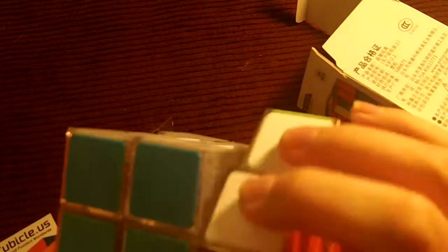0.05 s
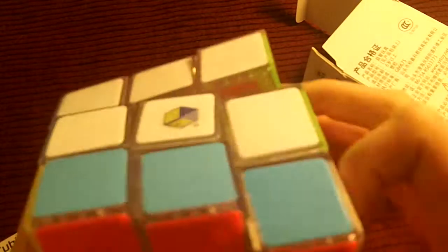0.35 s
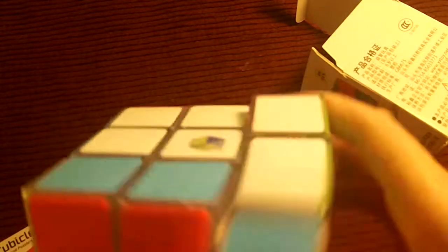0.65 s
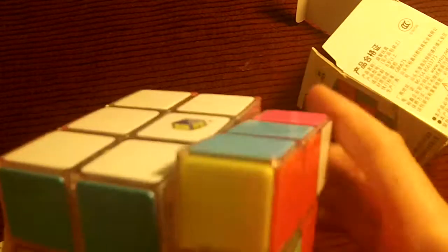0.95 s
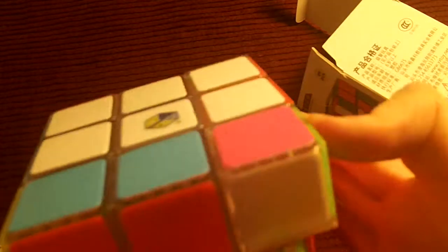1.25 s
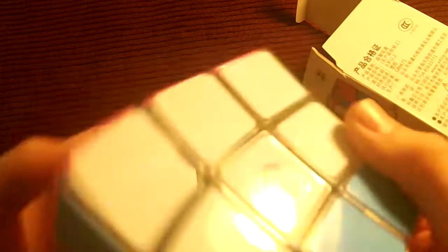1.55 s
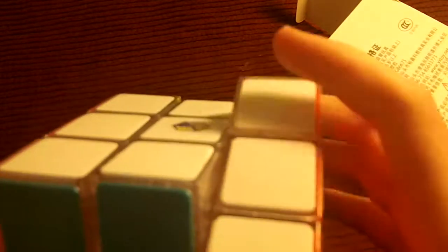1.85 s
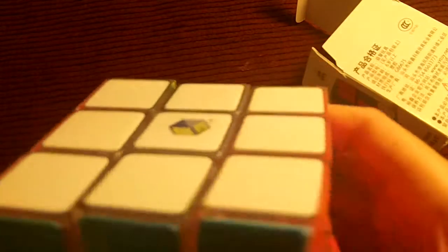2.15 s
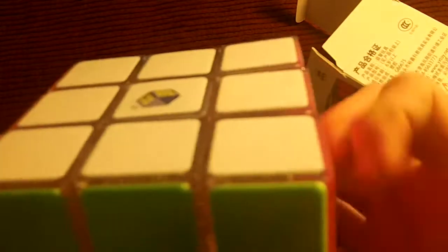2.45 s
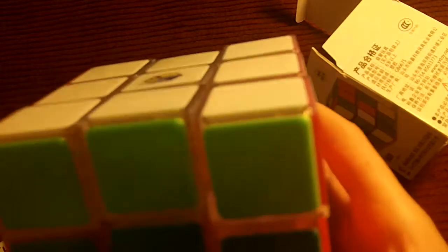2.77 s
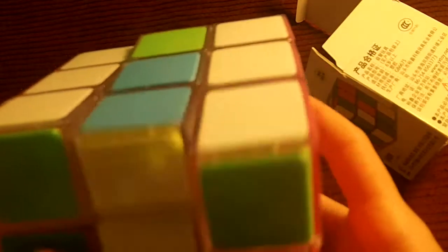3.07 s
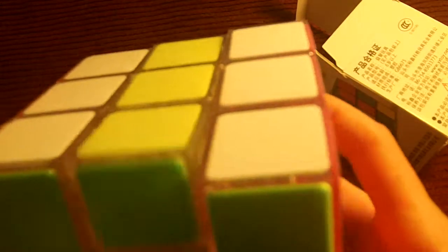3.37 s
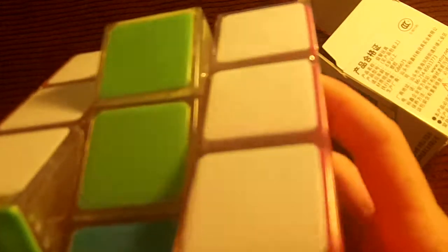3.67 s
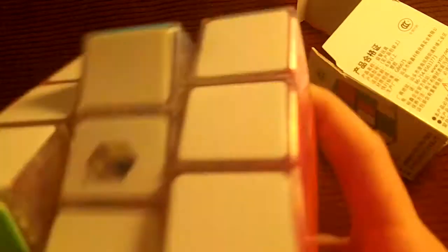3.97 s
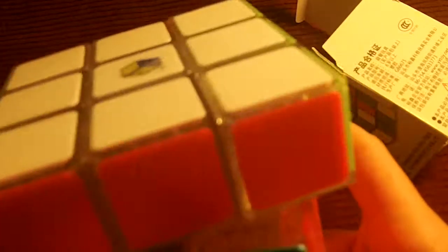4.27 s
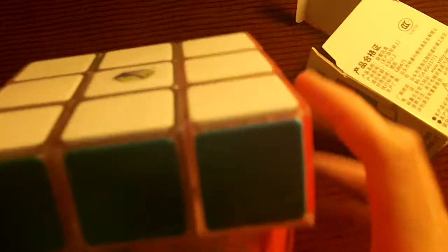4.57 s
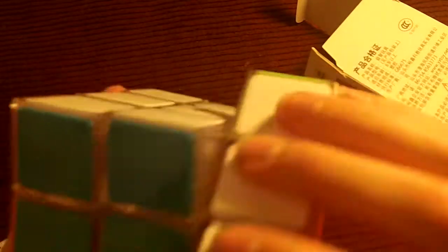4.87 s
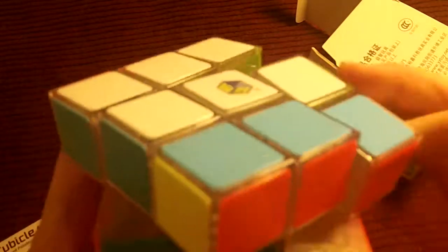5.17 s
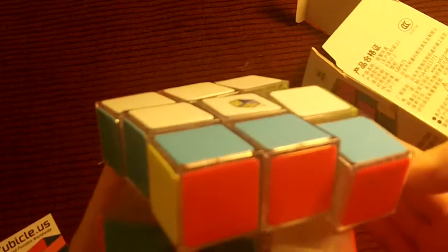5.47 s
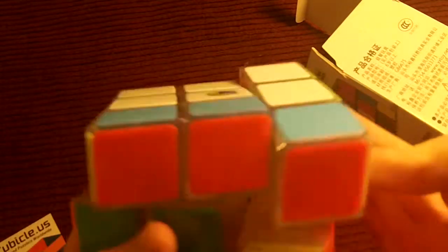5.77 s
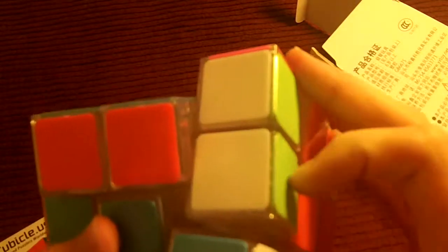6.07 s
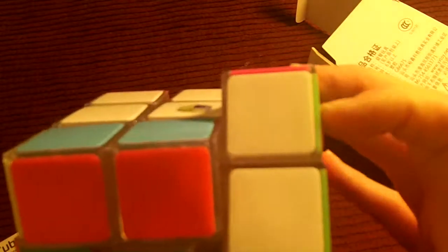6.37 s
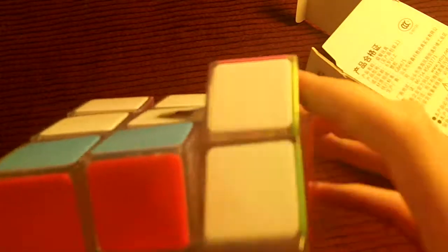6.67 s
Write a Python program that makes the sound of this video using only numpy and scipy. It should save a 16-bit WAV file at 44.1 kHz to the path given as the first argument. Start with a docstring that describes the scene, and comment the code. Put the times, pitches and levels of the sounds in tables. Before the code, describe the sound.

Close up, quick irregular bursts of plastic clicks, hollow knocks and rasping scrapes come from a puzzle cube being turned by hand. Brief lulls hold softer rubbing, dull taps and thin ticks, with a tiny squeak and a short hissing skid a little before the middle. More runs of clacks follow to the end, with a faint ring and a low hum in the small room.

```python
"""A small room: a plastic puzzle cube is turned quickly by hand, close to a microphone.
Each turn is a stick-slip scrape that swells until the layer stops. Pieces collide, ringing the hollow
inside and snapping on their thin shells; edges tick past. Between turns the fingers shift their hold
and the pieces rub, tap and rattle, with one tiny squeak and two hissing skids.
The room rings on faintly over a low hum; a limiter holds the loudest clacks down."""
import sys
import numpy as np
from scipy import signal
from scipy.fft import rfft, irfft
from scipy.io import wavfile
from scipy.ndimage import uniform_filter1d

SR = 44100
rng = np.random.default_rng(int(sys.argv[2]) if len(sys.argv) > 2 else 0)


def put_to_file(sound):
    """Save the sound as 16-bit audio at rate SR, in the file named by the first command-line argument."""
    columns = np.atleast_2d(sound).T  # one column per channel
    safe = np.clip(columns, -1, 1)
    whole_steps = np.round(safe * 32767)
    wavfile.write(sys.argv[1], SR, whole_steps.astype(np.int16))


N = 305422
TIME, HZ = np.arange(N) / SR, np.fft.rfftfreq(N, 1 / SR)
CLICK_S = .005  # nominal click length; also the lead-in before a contact
CONTACT_TIME = np.arange(SR // 22) / SR - round(CLICK_S * SR) / SR  # 0 at impact
KNOCK_DB, SNAP_DB = -5, 3.5  # radiation gains: cavity, shells

# Table levels are relative.
# room noise spectrum: f/Hz, level/dB
NOISE_SPECTRUM = [(20, -24), (70, -9), (130, -11), (900, -15), (3000, -39), (7000, -22.5), (15000, -28.5)]
# layer turns: stop t/s, run-up/s, rasp level/dB, cavity level/dB
LAYER_TURNS = [(0.033, 0.036, -28, -24), (0.096, 0.035, -31.5, -32), (0.174, 0.045, -30.5, -29),
               (0.299, 0.021, -28, -52), (0.442, 0.0087, -40, -47), (0.527, 0.053, -38, -29.5),
               (0.733, 0.076, -30.5, -29.5), (0.893, 0.19, -41, -37.5), (1.209, 0.068, -33.5, -46),
               (1.419, 0.034, -34, -23), (1.514, 0.053, -35, -29), (1.62, 0.027, -31.5, -38),
               (1.777, 0.12, -32.5, -36), (2.261, 0.031, -24, -20.5), (2.398, 0.038, -26.5, -24),
               (2.857, 0.055, -27, -29), (3.166, 0.077, -28, -35), (3.456, 0.049, -33.5, -38),
               (3.933, 0.071, -31.5, -35), (4.079, 0.18, -29, -31), (4.375, 0.042, -26, -36),
               (4.791, .1, -33, -37), (4.987, 0.066, -28, -36), (5.093, 0.034, -34, -38),
               (5.548, 0.029, -41, -53), (5.611, 0.03, -35.5, -45), (5.89, 0.19, -36, -41),
               (6.462, 0.035, -32, -30), (6.77, 0.11, -34, -36), (6.912, 0.014, -28, -35)]
# sliding plastic spectrum: f/Hz, level/dB
RUB_SPECTRUM = [(100, -6.5), (400, 2.5), (800, 11.5), (1500, 8.5), (2500, 0), (4000, 4), (7200, 1),
                (9500, -3.5), (12000, -13), (15500, -32)]
# cavity pitch as the grip opens and closes it: t/s, f/Hz
GRIP_PITCH = [(.3, 1040), (.5, 1170), (.75, 905), (2.4, 930), (2.9, 820), (3.9, 850), (4.8, 820),
              (5.2, 1200), (6.2, 1063)]
# pieces colliding: t/s, knock level/dB, cavity f/Hz, snap level/dB, shell f/Hz
COLLISIONS = [(0.0134, -18, 1040, -28, 3500), (0.033, -22, 810, -56, 3160), (0.1007, -18, 1080, -32, 2610),
              (0.1372, -10, 1055, -28.5, 2860), (0.179, -16, 1030, -21.5, 3930),
              (0.1997, -20, 1130, -30.5, 4000), (0.226, -12, 1070, -27, 4200),
              (0.287, -17, 1010, -31, 4470), (0.293, -18.5, 1090, -26, 3770),
              (0.517, -14.5, 1110, -37, 2740), (0.5318, -28, 960, -28, 4150),
              (0.5369, -30, 980, -26.5, 3700), (0.603, -24.5, 1020, -25.5, 3130),
              (0.7192, -23, 990, -29.5, 2200), (0.7275, -12, 990, -23, 4930),
              (0.7654, -12.5, 930, -23.5, 3060), (0.8601, -15.5, 1260, -19, 3880),
              (0.898, -21.5, 940, -22.5, 3260), (1.206, -20, 774, -33, 3640), (1.212, -19, 830, -24, 3660),
              (1.2166, -26, 980, -22.5, 3870), (1.4136, -22.5, 1290, -27, 3240),
              (1.4893, -20, 1060, -22, 5200), (1.4919, -20, 845, -19.5, 5200),
              (1.4961, -20.5, 930, -23, 4370), (1.518, -22.5, 990, -22, 4170), (1.572, -34, 955, -32, 3420),
              (1.6145, -17, 944, -26.5, 2370), (1.7315, -23, 1230, -40, 3300),
              (1.76, -19.5, 970, -24.5, 7300), (1.771, -15, 1100, -26.5, 2860),
              (2.2567, -17.5, 1290, -35, 3720), (2.2645, -20, 950, -23.5, 3670),
              (2.2925, -24, 1060, -28, 3830), (2.3766, -27, 920, -29, 3630),
              (2.3852, -28, 990, -23.5, 4900), (2.395, -17, 960, -24, 3800), (2.8153, -19, 1000, -39, 3410),
              (2.853, -11.5, 875, -22.5, 4060), (2.861, -29, 900, -30, 4250),
              (3.079, -39, 1050, -35.5, 4280), (3.118, -16.5, 940, -22.5, 1770),
              (3.1562, -20.5, 785, -28, 2620), (3.2029, -30, 910, -37, 2480), (3.418, -22, 930, -31, 3530),
              (3.448, -18, 1260, -33, 3310), (3.4544, -14.5, 980, -20.5, 3700),
              (3.4607, -16.5, 1230, -20.5, 3150), (3.9296, -17, 780, -28.5, 2720),
              (4.041, -18.5, 1220, -22.5, 3840), (4.0475, -23, 1060, -24.5, 4000),
              (4.067, -19.5, 980, -27, 5060), (4.0927, -18, 900, -24.5, 6200),
              (4.3709, -18.5, 980, -38, 3200), (4.402, -22.5, 840, -28, 3050),
              (4.7441, -14, 890, -26.5, 4660), (4.7692, -19.5, 980, -47, 3220),
              (4.7783, -22.5, 800, -30, 2880), (4.82, -16, 1195, -24, 3500), (4.9338, -20, 980, -33, 4470),
              (4.963, -15, 1380, -23, 4000), (4.982, -13, 890, -27.5, 4050), (5.007, -14, 1010, -22, 3360),
              (5.0859, -18.5, 1045, -19, 4830), (5.092, -15, 1100, -30.5, 4500),
              (5.6045, -29, 1300, -22, 3780), (5.608, -23, 1200, -20, 3930),
              (5.6126, -26.5, 1240, -24, 4340), (5.7725, -32, 960, -36, 5340),
              (5.8736, -29, 1070, -25.5, 4100), (5.8885, -30, 1090, -24.5, 3380),
              (6.479, -15, 1050, -26, 3670), (6.483, -11, 1245, -24.5, 3730),
              (6.4926, -25, 1070, -28, 5100), (6.541, -36, 1110, -36.5, 3900),
              (6.7174, -29, 1180, -29, 3050), (6.725, -15, 1030, -33, 2920),
              (6.7454, -24, 1210, -20.5, 3980), (6.7718, -34, 1060, -27, 5430),
              (6.788, -24.5, 940, -31.5, 3480), (6.8733, -11, 846, -24, 4230), (6.911, -16, 880, -19, 3350)]
# thin shell spectrum: f/Hz, level/dB
SHELL_SPECTRUM = [(70, -11.5), (250, -3.5), (700, 2), (1600, 10), (2500, 5), (4200, 5), (7200, 4.5),
                  (9000, -2), (12000, -10), (15500, -19.5)]
# dull taps of a finger or loose piece: t/s, level/dB
DULL_TAPS = [(0.072, -22.5), (0.236, -23), (0.6831, -23), (1.103, -29.5), (1.165, -29.5), (1.343, -31),
             (1.649, -35), (1.846, -35), (1.92, -38), (2.02, -35), (2.186, -32.5), (2.345, -23.5),
             (2.708, -38.5), (2.781, -32.5), (2.843, -22.5), (2.936, -28.5), (3.103, -26.5), (3.236, -32.5),
             (3.374, -36.5), (3.7, -43), (3.731, -40), (3.764, -41), (3.856, -34), (3.867, -25),
             (4.262, -36), (4.355, -32), (4.555, -39), (4.62, -44.5), (4.729, -30.5), (4.8062, -22),
             (4.899, -33), (4.912, -24), (5.294, -31.5), (5.436, -33), (6.019, -35), (6.048, -33),
             (6.087, -32.5), (6.187, -30), (6.284, -24), (6.324, -35), (6.568, -32)]
# hard stops of a layer: t/s, level/dB
HARD_STOPS = [(0.1797, -24), (0.767, -35), (1.772, -32.5), (3.455, -29), (4.964, -31), (6.875, -27)]
# shifts of the hold: t/s, length/s, rasp level/dB, cavity level/dB
HOLD_SHIFTS = [(0.33, 0.16, -48, -65), (1.27, 0.089, -50, -59), (1.788, 0.12, -51, -42.5),
               (2.082, 0.18, -47.5, -79), (2.403, 0.14, -48, -46.5), (3.384, 0.037, -45, -40),
               (3.742, 0.15, -51.5, -59), (4.132, 0.16, -51.5, -68), (4.556, 0.094, -60, -73),
               (4.81, 0.073, -49, -38), (5.123, 0.38, -54.5, -61), (5.947, 0.16, -51.5, -74),
               (6.184, 0.13, -52, -43)]
# edges flicking past: t/s, level/dB
EDGE_TICKS = [(0.3854, -31.5), (0.5373, -25.5), (0.6034, -34), (0.862, -15), (1.512, -43), (1.791, -38),
              (2.423, -32), (3.1398, -33), (3.971, -36), (3.985, -42), (4.001, -33), (4.437, -19.5),
              (5.0263, -31), (5.243, -37), (5.283, -43.5), (5.401, -42), (5.561, -41), (5.764, -37.5),
              (5.8248, -34.5), (5.8611, -25.5), (5.8795, -29), (5.8988, -32), (5.9106, -22.5),
              (6.2696, -36), (6.4348, -35.5), (6.457, -30), (6.6689, -40.5), (6.687, -38)]
# edge resonances: f/Hz, level/dB, width/Hz
EDGE_MODES = [(3900, 16.5, 1000), (6670, 8, 210)]
# one plastic squeak: t/s, length/s, f/Hz, pitch rise/fraction, level/dB
PLASTIC_SQUEAK = (2.092, .019, 3150, .1, -43)
# bright skids: t/s, level/dB, length/s
BRIGHT_SKIDS = [(2.57, -30.5, 0.02), (4.134, -40.5, 0.002)]
# skid spectrum: f/Hz, level/dB
SKID_SPECTRUM = [(200, -21), (900, 0.5), (1600, 5), (3000, 5.5), (4800, 11.5), (6500, 6), (10000, 7),
                 (15000, -5)]
# radiation of a small body, weak in the bass: f/Hz, level/dB
BODY_RESPONSE = [(50, -27), (125, -4), (260, 1), (480, -4.5), (800, -0.5), (9000, 2), (14000, -1)]
# reverb spectrum: f/Hz, level/dB
ROOM_SPECTRUM = [(100, -17), (400, 13), (700, -2), (2500, 1), (5000, -1), (9000, 3.5), (15000, 10)]
# reverb decay: f/Hz, T60/s
ROOM_DECAY = [(200, 0.099), (900, 0.71), (5000, 0.6), (12000, 0.22)]
# dip in the microphone's response: f/Hz, width/Hz
MIC_NOTCH = (8050, 850)


def amp(db):
    """dB to gain."""
    return 10 ** (np.asarray(db) / 20)


def unit(x):
    """Scale to rms 1."""
    return x / np.sqrt(np.mean(x ** 2) + 1e-20)


def unit_click(x):
    """Scale to the energy of rms 1 held for CLICK_S."""
    return x / np.sqrt(np.sum(x ** 2) / (CLICK_S * SR) + 1e-20)


def at_hz(points, hz):
    """Interpolate a table over log frequency."""
    f, value = np.transpose(points)
    return np.interp(np.log(hz + 1), np.log(f + 1), value)


def grip_hz(s):
    """Cavity pitch at time s."""
    return np.interp(s, *np.transpose(GRIP_PITCH))


def add(mix, s, sound):
    """Mix in at time s."""
    part = mix[max(round(s * SR), 0):][:len(sound)]
    part += sound[:len(part)]


def colour(x, spectrum, size=2048):
    """Minimum-phase filter; attacks stay sharp."""
    log_gain = np.log(amp(at_hz(spectrum, abs(np.fft.fftfreq(size, 1 / SR)))))
    impulse = np.fft.ifft(np.exp(np.conj(signal.hilbert(log_gain)))).real
    return signal.fftconvolve(x, impulse[:size // 2])[:len(x)]


def resonate(x, hz, width_hz):
    """Band-pass resonance; pitch may move."""
    carrier = np.exp(2j * np.pi * np.cumsum(hz * np.ones(len(x))) / SR)
    pole = np.exp(-np.pi * width_hz / SR)
    return 2 * (carrier * signal.lfilter([1 - pole], [1, -pole], x / carrier)).real


def background(air_db=-62, hum_db=-59, hum_hz=58, waver_hz=5):
    """Quiet room noise and a low, wavering hum."""
    air = unit(irfft(rfft(rng.standard_normal(N)) * amp(at_hz(NOISE_SPECTRUM, HZ)), N))
    waver = unit(resonate(rng.standard_normal(N), hum_hz, waver_hz))
    hum = np.sqrt(2) * np.sin(2 * np.pi * hum_hz * TIME) + .79 * waver
    return amp(air_db) * air + amp(hum_db) * unit(hum)


def turning(grab_s=.0014, push_db=16, release_s=.017):
    """Rasp and cavity envelopes of the turns: quick grab, growing push, release after the stop."""
    levels = np.zeros((2, N))
    for stop_s, run_s, *dbs in LAYER_TURNS:
        t = np.arange(0, run_s + .3, 1 / SR)
        grab = np.minimum(t / grab_s, 1)
        push = amp(push_db * np.minimum(t / run_s - 1, 0))
        release = np.exp(-np.maximum(t - run_s, 0) / release_s)
        for level, db in zip(levels, dbs):
            add(level, stop_s - run_s, amp(db) * grab * push * release)
    return levels


def slips(per_s=1200, spread_db=3.7, slip_s=.00033, wall_width_hz=1100, walls=18):
    """Each slip is a short rasp that rings the wall it crosses."""
    strength = amp(spread_db * np.minimum(rng.exponential(1, N), 3.5))
    impulses = strength * (rng.random(N) < per_s / SR)
    wall = rng.integers(0, walls, N)
    u = np.arange(SR // 100) / SR / slip_s
    out = np.zeros(N)
    for k, hz in enumerate(np.geomspace(1300, 10000, walls)):
        rasp = unit_click(rng.standard_normal(len(u)) * u * np.exp(-u))
        ring = unit_click(resonate(rasp, hz, wall_width_hz))
        out += signal.oaconvolve(impulses * (wall == k), rasp + .85 * ring)[:N]
    return unit(out)


def scrape(rasp_level, cavity_level, catch_db=-50, smooth=.28, cavity_width_hz=105, skirt_hz=800):
    """Sliding plastic: tiny slips over smooth hiss, sounding through shells and cavity."""
    grit = rasp_level / (rasp_level + amp(catch_db))  # a light slide whispers, a pressed one catches
    force = (grit * slips() + smooth * rng.standard_normal(N)) / np.hypot(grit, smooth)
    pitch_hz = grip_hz(TIME)
    hollow = unit(resonate(resonate(force, pitch_hz, cavity_width_hz), pitch_hz, skirt_hz))
    rasp = unit(colour(force, RUB_SPECTRUM))
    return amp(-1) * rasp_level * rasp + amp(-6) * cavity_level * hollow


def chatter(loose, fade_s=.0038, graze_s=.0025, strike_s=.0005, settle_s=.0039):
    """Contact force: edges graze, strike once, then settle in a spray of tiny contacts."""
    t = CONTACT_TIME
    spray = rng.standard_normal(len(t)) * rng.exponential(1, len(t))
    before = amp(-13) * np.exp(-abs(t) / graze_s)
    after = np.exp(-abs(t) / fade_s) + amp(-14) * np.exp(-abs(t) / settle_s)
    strike = rng.standard_normal(len(t)) * np.exp(-abs(t) / strike_s) * (t >= 0)
    return unit_click(strike) + loose * unit_click(spray * np.where(t < 0, before, after))


def collision(knock_db, cavity_hz, snap_db, shell_hz, cavity_width_hz=190, shell_width_hz=700,
              skirt_hz=1000, firm_db=-21, firm_hz=9000):
    """A hit rings the air inside the cube and the wall of one piece."""
    squareness = np.tanh((snap_db - knock_db) / 8)  # square hits snap more, chatter less
    force = chatter(loose=1.42 * 2 ** -squareness)
    cutoff_hz = firm_hz * amp(.5 * (snap_db - firm_db))  # gentle hits are duller
    pole = np.exp(-2 * np.pi * cutoff_hz / SR)
    crack = unit_click(colour(signal.lfilter([1], [1, -pole], force), SHELL_SPECTRUM))
    snap = unit_click(crack + .55 * unit_click(resonate(crack, shell_hz, shell_width_hz)))
    age = np.maximum(CONTACT_TIME, 0)
    ring = unit_click(np.exp(-np.pi * cavity_width_hz * age) * np.sin(2 * np.pi * cavity_hz * age))
    rattle = unit_click(resonate(force, cavity_hz, cavity_width_hz))
    knock = unit_click(resonate(ring + .95 * rattle, cavity_hz, skirt_hz))
    return amp(knock_db) * knock + amp(snap_db) * snap


def clacks():
    """Pieces collide during the turns, each hit on a different wall."""
    out = np.zeros(N)
    for s, knock_db, cavity_hz, snap_db, shell_hz in COLLISIONS:
        add(out, s - CLICK_S, collision(knock_db + KNOCK_DB, cavity_hz, snap_db + SNAP_DB, shell_hz))
    return out


def taps(events, snap_db=-12, shell_hz=2900, scatter_oct=.77):
    """Soft contacts on random pieces: mostly cavity at the grip's pitch, little snap."""
    out = np.zeros(N)
    for s, db in events:
        wall_hz = shell_hz * 2 ** (scatter_oct * rng.uniform(-1.1, 1))
        add(out, s - CLICK_S, collision(db + KNOCK_DB, grip_hz(s), db + SNAP_DB + snap_db, wall_hz))
    return out


def jolts(push_s=.00042):
    """A stopped layer shoves the whole cube: a dull push, no ring."""
    u = np.arange(SR // 40) / SR / push_s
    push = unit_click(u * (2 - u) * np.exp(-u))
    out = np.zeros(N)
    for s, db in HARD_STOPS:
        add(out, s, amp(db) * push)
    return out


def regripping(ease_s=.022, uneven_db=3, uneven_s=.016, rest_db=-67):
    """Rasp and cavity envelopes as the hold shifts: pressure wanders, hands are never quite still."""
    pressure = uniform_filter1d(rng.standard_normal(N), round(uneven_s * SR))
    pressure = unit(uniform_filter1d(pressure, round(uneven_s * SR / 2)))
    levels = np.full((2, N), amp(rest_db))
    for s, length_s, *dbs in HOLD_SHIFTS:
        inside_s = np.minimum(TIME - s, s + length_s - TIME)
        levels += np.outer(amp(dbs), .5 + .5 * np.tanh(2 * inside_s / ease_s))
    return levels * amp(uneven_db * np.tanh(pressure))


def rattles(rasp_level, per_s=22, boost_db=5, spread_db=6):
    """Loose pieces tap at uneven intervals, following the rasp level."""
    events = []
    for k, (jitter, strength) in enumerate(rng.random((round(per_s * N / SR), 2))):
        s = (k + jitter) / per_s
        rasp_db = 20 * np.log10(np.interp(s, TIME, rasp_level))
        events.append((s, rasp_db + boost_db + spread_db * (2 * strength - 1)))
    return taps(events)


def ticks(scatter_oct=.093, band_hz=(2200, 10500), cavity_width_hz=200):
    """Edges flick past as layers line up: a thin, high ring that barely stirs the cavity."""
    band = signal.butter(2, band_hz, "band", fs=SR)
    out = np.zeros(N)
    for s, db in EDGE_TICKS:
        force = chatter(loose=.57, fade_s=.0046)
        detune = 2 ** (scatter_oct * rng.standard_normal())
        ring = sum(amp(mode_db) * unit_click(resonate(force, hz * detune, width_hz))
                   for hz, mode_db, width_hz in EDGE_MODES)
        thin = unit_click(signal.lfilter(*band, ring))
        knock = unit_click(resonate(force, grip_hz(s), cavity_width_hz))
        knock_db = min(-33 + .23 * db, db)
        add(out, s - CLICK_S, amp(db) * thin + amp(knock_db) * knock)
    return out


def squeak():
    """Regular stick-slip: a tone and its octave, pitch arching with the swell."""
    s, length_s, hz, rise, db = PLASTIC_SQUEAK
    swell = np.sin(np.pi * np.clip((TIME - s) / length_s, 0, 1))
    phase = 2 * np.pi * np.cumsum(hz * (1 + rise * swell)) / SR
    return amp(db) * swell * (np.sin(phase) + np.sin(2 * phase))


def skids(fade_s=.0041, linger_db=-9, linger_s=.042):
    """Quick rubs of a smooth surface: sudden hiss, fast fall, trailing whisper."""
    level = np.zeros(N)
    for s, db, length_s in BRIGHT_SKIDS:
        after_s = np.maximum(TIME[:SR // 4] - length_s, 0)
        shape = np.exp(-after_s / fade_s) + amp(linger_db) * np.exp(-after_s / linger_s)
        add(level, s, amp(db) * shape)
    return unit(colour(rng.standard_normal(N), SKID_SPECTRUM)) * level


def room_tail(build_s=.0024, size=256):
    """Diffuse impulse response: fast build-up, each band with its own decay."""
    hz, t, bands = signal.stft(rng.standard_normal(SR), SR, nperseg=size)
    level_db = at_hz(ROOM_SPECTRUM, hz)[:, None] - 60 * t / at_hz(ROOM_DECAY, hz)[:, None]
    response = signal.istft(bands * amp(level_db), SR, nperseg=size)[1][:SR]
    response *= 1 - np.exp(-TIME[:SR] / build_s)
    return response / np.linalg.norm(response)


def room(x, paths=3, swing_hz=85):
    """Pieces keep facing new ways, so successive contacts reach the room by different paths."""
    angle = 2 * np.pi * swing_hz * TIME
    feeds = (x * np.cos(angle + np.pi * k / paths) for k in range(paths))
    return np.sqrt(2 / paths) * sum(signal.fftconvolve(feed, room_tail())[:N] for feed in feeds)


def scene(cube_send_db=-14.5, skid_send_db=-7, tick_send_db=-19, linger_db=-11, linger_hz=890):
    """The cube close by, the room behind it, and a narrow hollow ring that lingers."""
    hold = regripping()
    pieces = clacks() + taps(DULL_TAPS) + scrape(*(turning() + hold)) + rattles(hold[0])
    cube = colour(pieces, BODY_RESPONSE) + jolts() + squeak()
    hiss, edges = skids(), ticks()
    ring = resonate(cube, linger_hz, width_hz=32)
    linger = amp(linger_db) * signal.fftconvolve(ring, room_tail())[:N]
    send = amp(cube_send_db) * cube + amp(skid_send_db) * hiss + amp(tick_send_db) * edges
    return (cube + hiss + edges + room(send) + linger + background())[None]


def record(dry, ceiling_db=-5, recover_db_per_s=900, cutoff_hz=16100):
    """Microphone notch, fast peak limiter, low-pass."""
    notch_hz, width_hz = MIC_NOTCH
    x = signal.lfilter(*signal.iirnotch(notch_hz, notch_hz / width_hz, SR), dry[0])
    over_db = np.maximum(20 * np.log10(abs(x) + 1e-9) - ceiling_db, 0)
    recovery_db = recover_db_per_s * TIME
    reduction_db = np.maximum.accumulate(over_db + recovery_db) - recovery_db
    low_pass = signal.firwin(201, cutoff_hz, window=("kaiser", 9), fs=SR)
    return signal.oaconvolve(x / amp(reduction_db), low_pass, "same")[None]


dry = scene()
out = record(dry)
put_to_file(out)
```